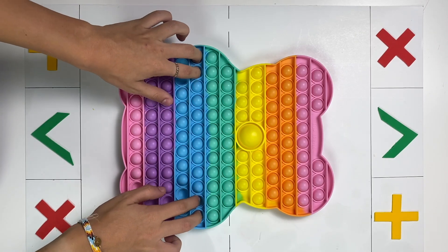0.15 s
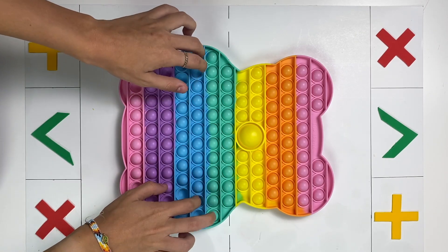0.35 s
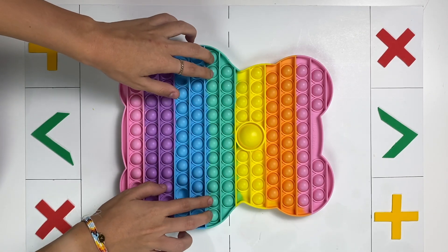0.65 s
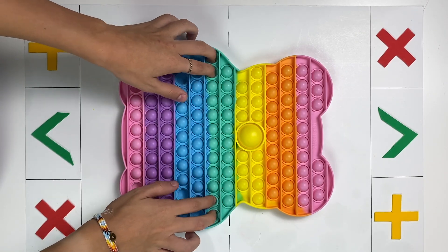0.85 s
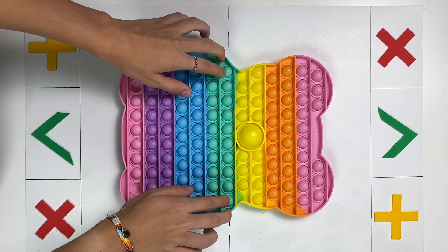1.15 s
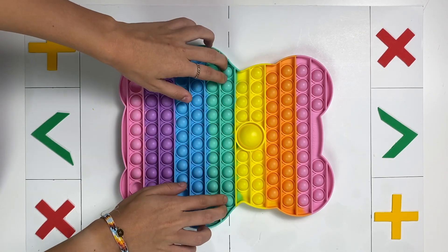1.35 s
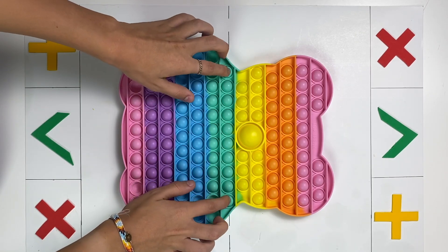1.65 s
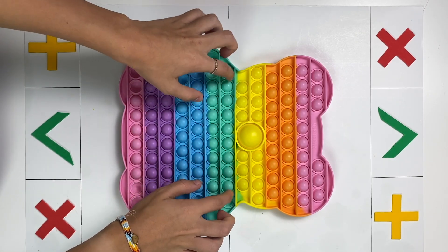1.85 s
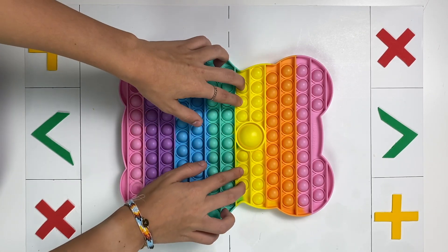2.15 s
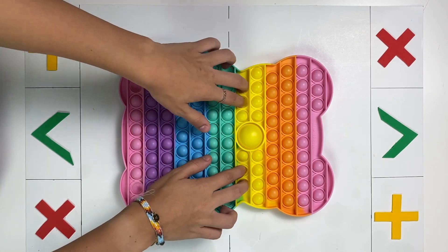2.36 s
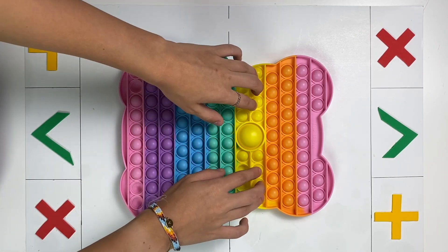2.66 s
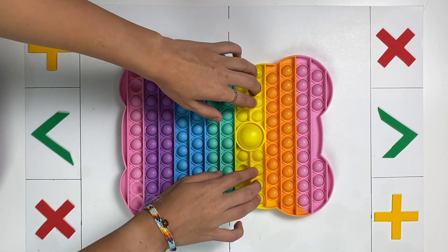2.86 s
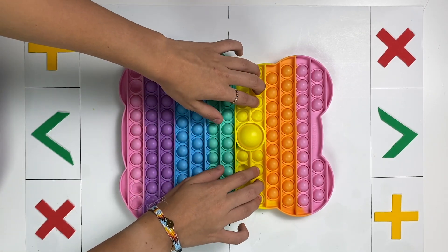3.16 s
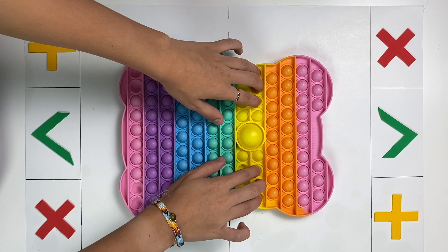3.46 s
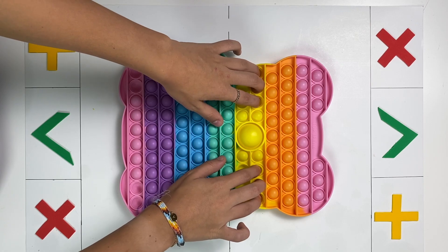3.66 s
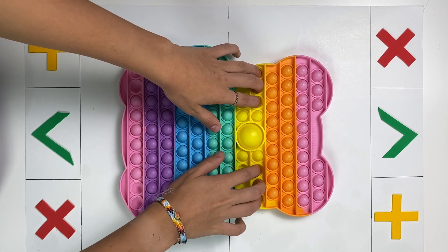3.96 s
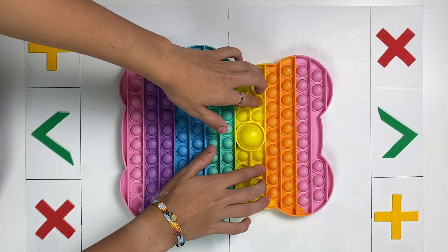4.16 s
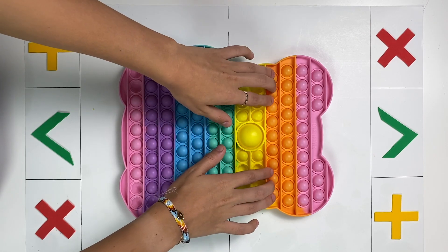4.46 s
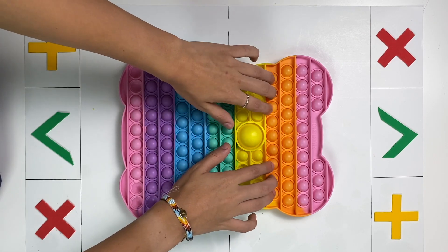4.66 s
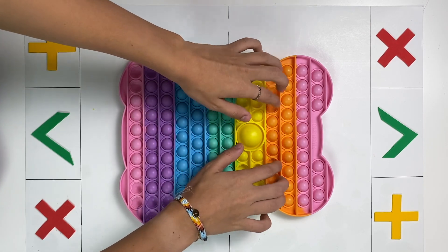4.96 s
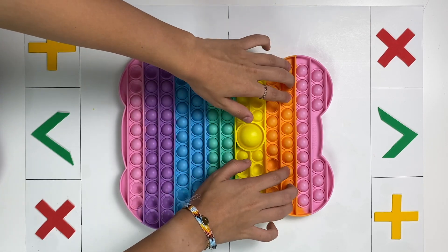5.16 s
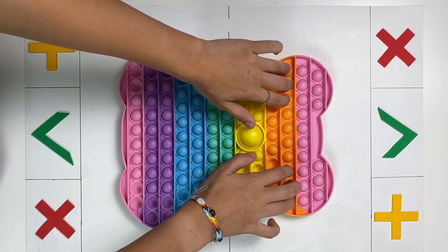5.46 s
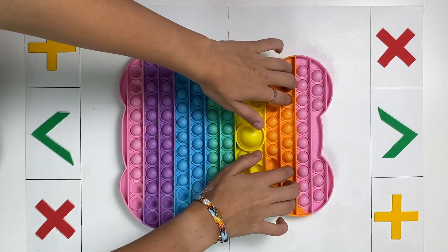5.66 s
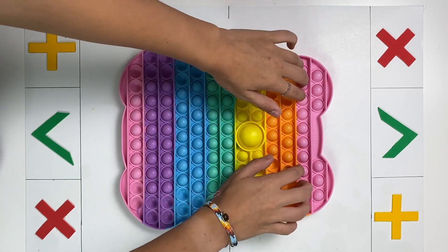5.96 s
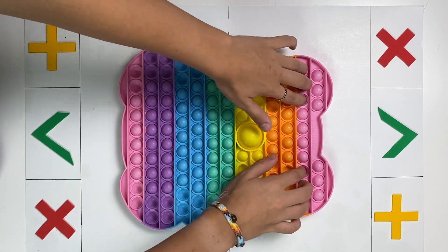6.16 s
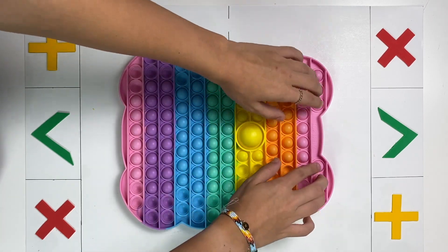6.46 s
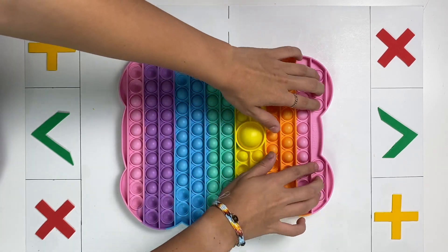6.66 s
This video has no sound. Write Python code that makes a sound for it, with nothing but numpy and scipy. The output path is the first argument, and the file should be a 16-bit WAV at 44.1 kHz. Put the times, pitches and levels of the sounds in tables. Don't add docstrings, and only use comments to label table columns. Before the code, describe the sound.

Fingers push silicone bubbles inside out in small uneven bursts of crisp, hollow pops on a table, with a faint low motor hum between.

```python
import sys
import numpy as np
from scipy import signal
from scipy.fft import rfft, irfft, next_fast_len
from scipy.io import wavfile

SR = 44100
rng = np.random.default_rng(int(sys.argv[2]) if len(sys.argv) > 2 else 0)


def file_out(sig):
    cols = np.atleast_2d(sig).T
    lim = np.clip(cols, -1, 1)
    pcm = np.round(lim * 32767).astype(np.int16)
    wavfile.write(sys.argv[1], SR, pcm)


def nominal_scale(level):
    x = np.asarray(level, float) / 20
    return 10 ** x


N = 300321
T = np.arange(N) / SR

# (frequency [Hz], level [dB])
MOTOR_TONES = [(73.49, -81), (79.77, -78), (90.71, -72.5), (95.62, -67.3), (98.83, -69.3), (100.99, -64.5),
               (203.79, -74), (314.45, -84)]
# (time [s], level [dB])
MOTOR_LOAD = [(0, -3), (.4, 3.5), (.7, -1.5), (1.1, 3), (1.6, -0.5), (1.9, 2), (2.15, -8), (2.5, 1),
              (3.1, -2), (3.7, 4), (4.2, 0), (4.4, -3), (4.8, 2), (5.3, -3), (5.6, 1.5), (6.1, -1.5),
              (6.5, -3), (6.81, 0.5)]
# (frequency [Hz], width [Hz], level [dB])
RUMBLES = [(84, 25, -68), (98, 14, -73.5), (189, 12, -76.5), (201, 4.7, -79.5), (303, 7.8, -83.5)]
# (frequency [Hz], level per Hz [dB])
QUIET_SPECTRUM = [(20, -23), (45, -8.5), (130, 0.5), (250, -5), (400, -12.5), (800, -18.5), (1500, -26),
                  (3000, -31.5), (8000, -34.5), (13000, -37.5), (14500, -53), (17000, -60)]
# (frequency [Hz], likeness [0-1])
LIKENESS = [(60, 0.98), (130, 1), (300, 0.8), (700, 0.4), (1500, 0.01), (16000, 0.1)]
# (frequency [Hz], t60 [s], level [dB])
ROOM_DECAY = [(150, 0.53, -11.5), (395, 0.29, -14.5), (900, 0.29, -9.5), (1861.6, 0.31, -14.5),
              (4330, .31, -19.5), (8000, 0.28, -16.5), (12000, 0.23, -21), (16000, .16, -26)]
# (time [s], length [s], frequency [Hz], width [Hz], level [dB])
SKIN_RUBS = [(1.46, .1, 6650, 700, -82), (3.465, .255, 7790, 50, -72), (4.012, .05, 3310, 250, -82),
             (4.535, .075, 6650, 700, -82), (2.862, .03, 5010, 400, -75), (5.03, .08, 4810, 400, -84),
             (4.119, .03, 6500, 5000, -73), (.344, .025, 4800, 1800, -68), (5.705, .03, 7200, 1800, -72),
             (5.69, .04, 2000, 2500, -70), (5.248, .012, 3000, 4000, -80), (6.613, .025, 9500, 2500, -75),
             (4.92, .03, 7000, 5000, -66), (6.29, .09, 7000, 2500, -76), (6.3, .08, 1500, 1200, -72)]
# (frequency [Hz], level [dB], t60 [s])
TABLE_MODES = [(99, -9.5, .07), (146, -6.5, 0.22), (183.5, -0.5, .15), (279.7, 0, 0.1), (317, -8.5, 0.11),
               (377.5, -13, 0.17)]
# (frequency [Hz], level [dB], t60 [s])
HOLLOW_MODES = [(477.5, -1.5, 0.049), (535, -4.5, 0.04), (561, -2, 0.049), (627, -1.5, 0.069),
                (661.3, -4, 0.086), (717, 0.5, 0.038)]
# (frequency [Hz], level [dB], t60 [s])
SHEET_MODES = [(842, -1, 0.033), (1008, 4.5, 0.018), (1101, -7, 0.031), (1213, -4.5, .035),
               (1393, -6.5, 0.012), (1574, -10, 0.015), (2106, -11, 0.023)]
# (frequency [Hz], level [dB])
CRACK_SPECTRUM = [(800, -41), (1500, -2), (2000, -1), (2600, -7.5), (3300, -4), (3750, -10), (4400, -6),
                  (5000, -11), (5600, -27), (7000, -33.5)]
# (frequency [Hz], level [dB])
TICK_SPECTRUM = [(3000, -39), (5400, -12), (6700, 2.5), (7500, -0.5), (9300, -6), (10200, -5.5),
                 (11500, -5), (14000, -3.5), (15800, -11.5), (16800, -51)]
# (time [s], crack [dB], sheet ring [dB], hollow ring [dB])
FINGER_TOUCHES = [(0.059, -47, -60.5, -60.5), (0.5736, -60, -60, -71), (0.5872, -72.5, -63, -61),
                  (.822, -55, -54, -50.5), (1.2363, -77.5, -73, -62.5), (1.2579, -68.5, -72, -64),
                  (1.3358, -76, -75, -70.5), (1.479, -70.5, -82, -66.5), (1.709, -58, -60, -57),
                  (2.3356, -52, -62.5, -56.5), (2.8736, -65.5, -59.5, -61), (2.992, -75.5, -61.5, -65),
                  (3.3, -76, -66, -68), (3.9548, -63.5, -86, -86), (4.0109, -66.5, -90.5, -82.5),
                  (4.0439, -66, -85, -91), (4.1191, -54.5, -72, -73), (4.17, -71, -69.5, -84),
                  (4.4654, -70, -68.5, -66), (4.5441, -60, -74, -71.5), (4.5725, -73, -66, -61),
                  (5.128, -67, -82, -66.5), (5.1788, -68, -68, -71), (5.2375, -78.5, -71, -77),
                  (5.789, -69, -67.5, -61.5), (5.8371, -84, -71, -57.5), (6.6158, -60.5, -70.5, -67.5),
                  (6.734, -69.5, -71, -76)]
# (time [s], crack [dB], sheet ring [dB], hollow ring [dB], table thud [dB])
DOME_SNAPS = [(.0757, -28, -27.5, -32.5, -40.5), (.1203, -25.5, -26.5, -26.5, -44.5),
              (.1676, -11, -22.5, -25.5, -46), (.832, -31.5, -33.5, -37, -39),
              (.856, -12.5, -16, -20.5, -37), (.9138, -12.5, -22, -27, -43.5),
              (1.727, -15.5, -23.5, -50.5, -45), (2.361, -29.5, -30.5, -31, -51),
              (2.3818, -16, -18.5, -27, -41.5), (2.394, -13, -39.5, -25.5, -42.5),
              (3.3875, -33, -34.5, -29, -48.5), (3.506, -29.5, -24.5, -29.5, -66.5),
              (3.5111, -20, -31.5, -33.5, -40), (3.7278, -11.5, -29.5, -31.5, -29),
              (4.7266, -34, -34.5, -34, -36), (4.7572, -21.5, -19.5, -29, -63), (4.788, -15, -29, -25, -47),
              (4.8185, -11.5, -27, -27.5, -38), (5.5043, -15, -22, -27, -26),
              (5.5277, -20, -16.5, -25.5, -29.5), (6.119, -28, -30, -27.5, -36),
              (6.1718, -13.5, -20.5, -27.5, -33), (6.1762, -18.5, -23, -55, -42),
              (6.1814, -28.5, -23, -40.5, -28.5)]
# (time [s], crack [dB], sheet ring [dB], hollow ring [dB], table thud [dB])
WALL_FOLDS = [(.0702, -44, -45, -37, -44), (.087, -31, -28, -38.5, -33.5), (.3601, -55, -38, -32.5, -39.5),
              (1.0334, -37, -53, -59, -46), (1.0427, -36, -30, -23, -28.5), (1.698, -62, -51, -42.5, -39.5),
              (1.7323, -28, -30, -27.5, -39), (2.379, -32, -35, -51, -51), (3.7234, -28, -25.5, -27.5, -46),
              (4.7066, -61.5, -57, -51.5, -47.5), (4.7511, -38, -33, -34, -34),
              (4.9268, -42.5, -50.5, -50, -46), (5.2981, -90, -54.5, -54.5, -60),
              (5.4945, -41, -33.5, -29, -37.5), (5.7142, -45.5, -54, -52, -46.5),
              (6.1124, -50, -56, -49, -47), (6.1894, -26, -29.5, -25.5, -35.5)]

PLACES = 5
SOFT_PUSH_S = 0.0012
LEAD = 256


def curve(table, hz, column=1):
    rows = np.array(table)
    return np.interp(np.log(hz + 1), np.log(rows[:, 0]), rows[:, column])


def shaped(x, gain):
    size = next_fast_len(x.shape[-1], real=True)
    spectrum = rfft(x, size) * gain(np.fft.rfftfreq(size, 1 / SR))
    return irfft(spectrum, size)[..., :x.shape[-1]]


def unit(x):
    return x / np.sqrt(np.mean(x ** 2))


def peak(x, db):
    return x * nominal_scale(db) / np.abs(x).max()


def resonance(centre_hz, width_hz):
    return lambda hz: 1 / (1 + (2 * (hz - centre_hz) / width_hz) ** 2)


def diffuse_pair(length, alike=1.0):
    mid, side = rng.standard_normal((2, length))

    def likeness(hz):
        return np.clip(curve(LIKENESS, hz) ** alike, 0, 1)

    mid = shaped(mid, lambda hz: np.sqrt(1 + likeness(hz)))
    side = shaped(side, lambda hz: np.sqrt(1 - likeness(hz)))
    return np.array([mid + side, mid - side]) / 2


def hum():
    in_step_s, quiet_db = -0.452, -70.5
    tones = 0
    for hz, db in MOTOR_TONES:
        tones = tones + np.sqrt(2) * nominal_scale(db) * np.cos(2 * np.pi * hz * (T - in_step_s))
    tones = tones * nominal_scale(np.interp(T, *np.transpose(MOTOR_LOAD)))
    rumble = 0
    for hz, width_hz, db in RUMBLES:
        rumble = rumble + nominal_scale(db) * unit(shaped(diffuse_pair(N), resonance(hz, width_hz)))
    hiss = unit(shaped(diffuse_pair(N), lambda hz: nominal_scale(curve(QUIET_SPECTRUM, hz))))
    return tones + rumble + nominal_scale(quiet_db) * hiss


def room(blow):
    t = np.arange(18000) / SR
    noise, tail = diffuse_pair(len(t), alike=0.9), 0
    for centre_hz in 100 * 2 ** np.arange(0, 7.6, 0.5):
        band = shaped(noise, lambda hz: np.maximum(0, 1 - 2 * np.abs(np.log2((hz + 1) / centre_hz))))
        decay = 1000.0 ** (-t / curve(ROOM_DECAY, centre_hz))
        tail = tail + band * decay * nominal_scale(curve(ROOM_DECAY, centre_hz, column=2) - 22)
    build_up_s, tail_ends_s = 0.00033, 0.18
    tail = tail * (1 - np.exp(-t / build_up_s)) / (1 + (t / tail_ends_s) ** 5)
    return signal.fftconvolve(blow[None], tail, axes=1)[:, :N]


def rubs():
    out = np.zeros((2, N))
    for s, length_s, hz, width_hz, db in SKIN_RUBS:
        start, size = int(s * SR), int(length_s * SR)
        swell = np.sin(np.pi * np.arange(size) / size) ** 0.48
        hiss = unit(shaped(diffuse_pair(16384), resonance(hz, width_hz)))[:, :size]
        out[:, start:start + size] += nominal_scale(db) * swell * hiss
    return out


def ring(modes, t, db, rise_s):
    hz, mode_db, t60 = np.array(modes).T[:, :, None]
    balance, detune = rng.standard_normal((2, len(modes), 1))
    gain = nominal_scale(mode_db + 3 * balance)
    swing = gain * np.sin(2 * np.pi * hz * (1 + 0.015 * detune) * t) * 1000.0 ** (-t / t60)
    return peak(np.sum(swing, axis=0) * (1 - np.exp(-t / rise_s)), db)


def crack(spectrum, noise, t, t60, scatter, soft):
    t60, scatter = t60 + 0.05 * soft, scatter + soft
    burst = scatter * noise * 1000.0 ** (-t / t60) * (t > 0)
    burst[:, np.argmax(t >= 0)] += 1 - soft
    return shaped(burst, lambda hz: nominal_scale(curve(spectrum, hz)))


def dispersion(hz):
    lag_cycles = 1.8 * np.log(1 + hz / 150)
    return np.exp(-2j * np.pi * lag_cycles) / (1 + (110 / (hz + 1)) ** 4)


def contacts():
    rows = []
    for table, tick_db, share in ((DOME_SNAPS, -12.5, 0.35), (WALL_FOLDS, -10.5, 0.29)):
        for s, crack_db, sheet_db, hollow_db, thud_db in table:
            blend_db = sheet_db + share * (crack_db - sheet_db)
            rows.append((s, crack_db, thud_db, hollow_db, tick_db + blend_db, sheet_db))
    for s, crack_db, sheet_db, hollow_db in FINGER_TOUCHES:
        rows.append((s, crack_db, hollow_db + 3.5, hollow_db, crack_db - 11.5, sheet_db))
    return rows


def pops():
    near, far = np.zeros((2, N + 16384)), np.zeros((PLACES, N + 16384))
    t = (np.arange(8192) - LEAD) / SR
    after = np.maximum(t, 0)
    fade = np.clip((t[-1] - t) / 0.05, 0, 1)
    for k, (s, crack_db, thud_db, hollow_db, tick_db, sheet_db) in enumerate(contacts()):
        chance, noise = rng.standard_normal(2), rng.standard_normal((2, 2, len(t)))
        noise[:, 1] = 0.85 * noise[:, 0] + 0.4 * noise[:, 1]
        soft = np.clip((-36 - crack_db) / 10, 0, 1)
        push_s = SOFT_PUSH_S * soft

        rings = ring(TABLE_MODES, after, thud_db + 0.5, 0.0018)
        rings = rings + ring(HOLLOW_MODES, after, hollow_db + 4.5, 0.0012)
        rings = rings + ring(SHEET_MODES, after, sheet_db + 5.0, 0.00021 + push_s)

        snap = peak(crack(CRACK_SPECTRUM, noise[0], t, 0.0063, 0.15, soft), crack_db - 7 * soft)
        tick = peak(crack(TICK_SPECTRUM, noise[1], t, 0.0097, 0.21, soft), tick_db + 11.5 - 7 * soft)
        edge = -snap - tick

        start = int(s * SR) - LEAD + 12
        span = slice(start, start + len(t))
        blow = 1.9 * rings * np.exp(-after / (0.0012 + push_s))
        blow = blow + 2.4 * edge[0] * np.exp(-np.abs(t) / 0.0003)
        far[k % PLACES, span] += shaped(blow, dispersion)

        sound = shaped((rings + edge) * fade, dispersion)
        lag_s, pan_db = 2.1e-5 + 0.4e-5 * chance[0], 0.23 * chance[1]
        bright = resonance(4500, 3000)
        sound[1] = shaped(sound[1], lambda hz: np.exp(-2j * np.pi * hz * lag_s) * (1 + 0.35 * bright(hz)))
        near[:, span] += sound * nominal_scale([[pan_db], [-pan_db]])
    return near[:, :N], far[:, :N]


def scene():
    near, far = pops()
    return near + sum(room(place) for place in far) + rubs() + hum()


def top_cut(x):
    return signal.sosfilt(signal.butter(12, 17000, fs=SR, output="sos"), x)


def record(dry):
    mix = shaped(dry, lambda hz: np.clip((16500 - hz) / 800, 0, 1))
    return top_cut(mix)


dry = scene()
out = record(dry)
file_out(out)
```